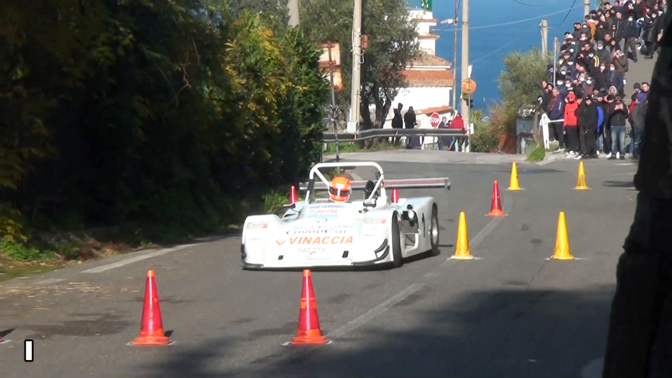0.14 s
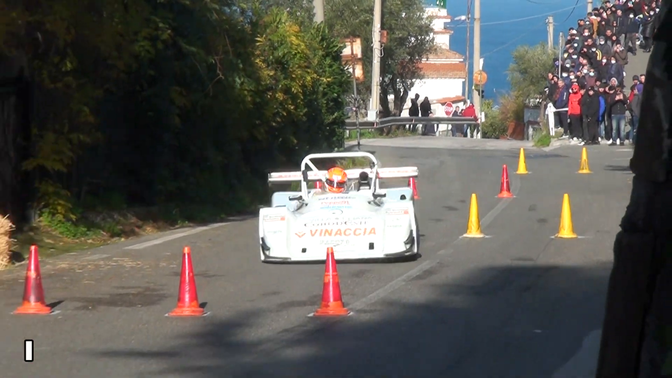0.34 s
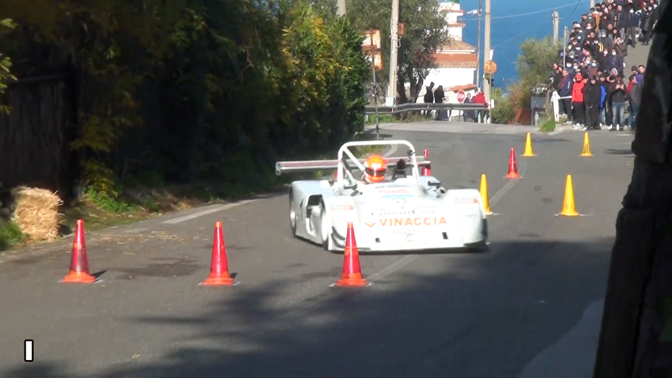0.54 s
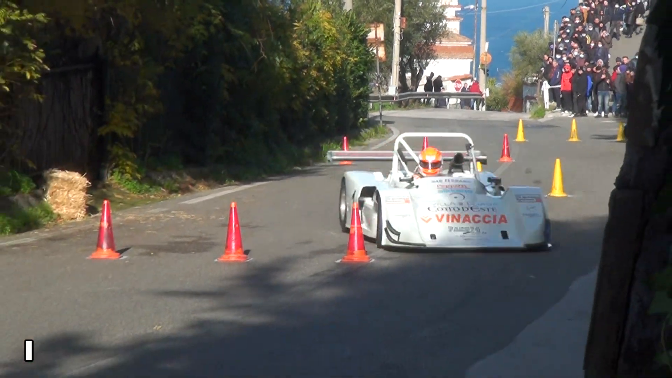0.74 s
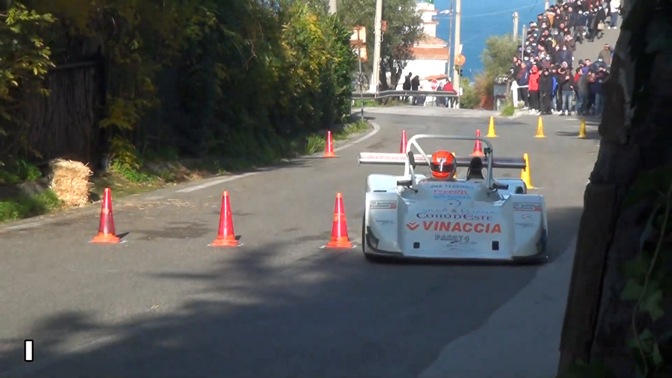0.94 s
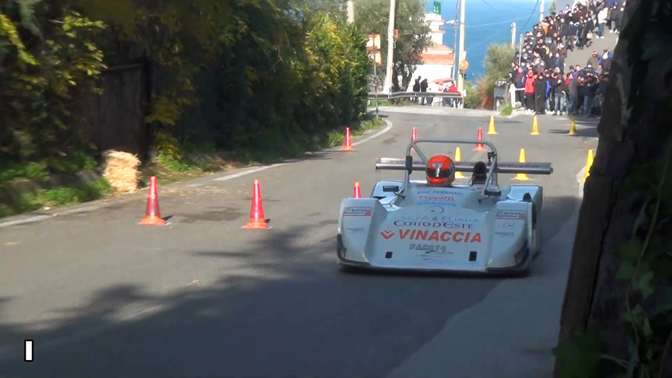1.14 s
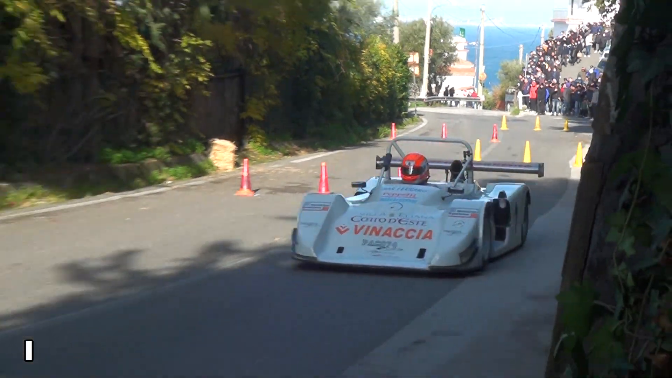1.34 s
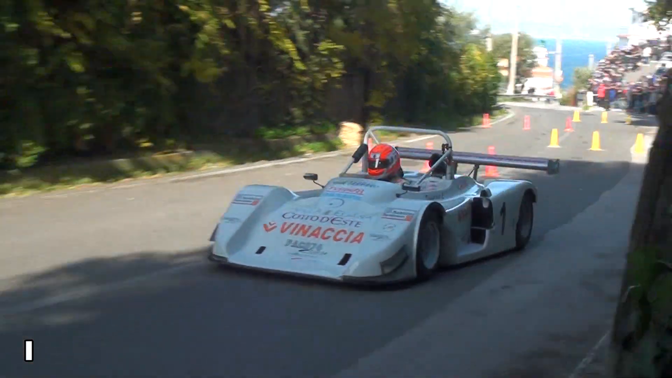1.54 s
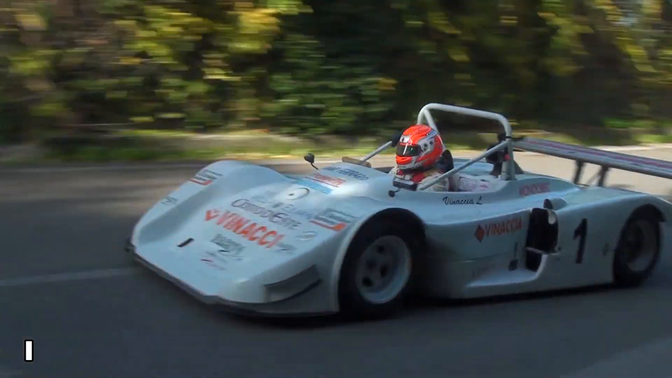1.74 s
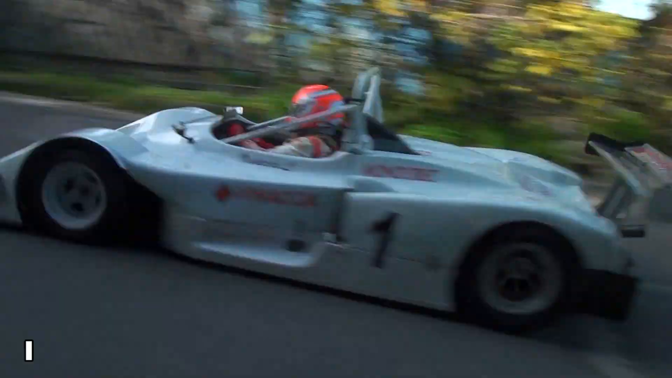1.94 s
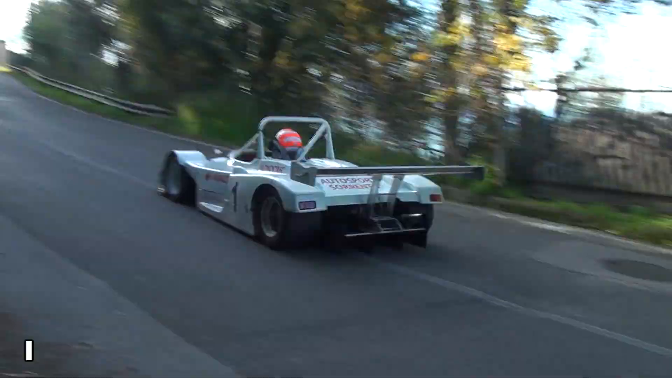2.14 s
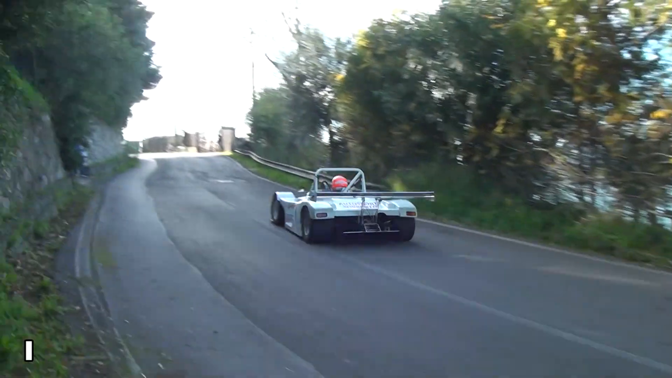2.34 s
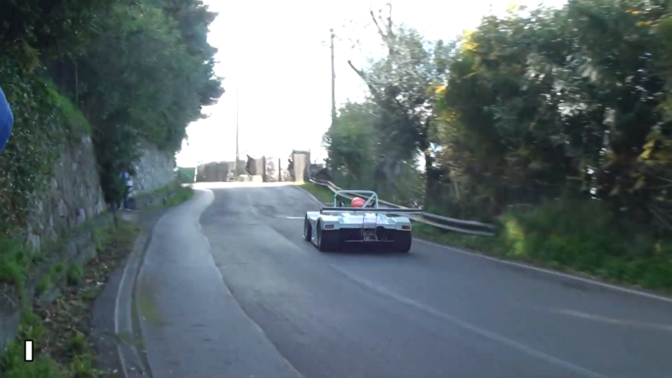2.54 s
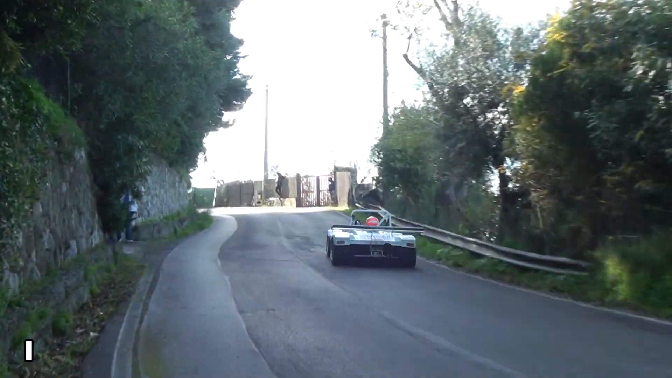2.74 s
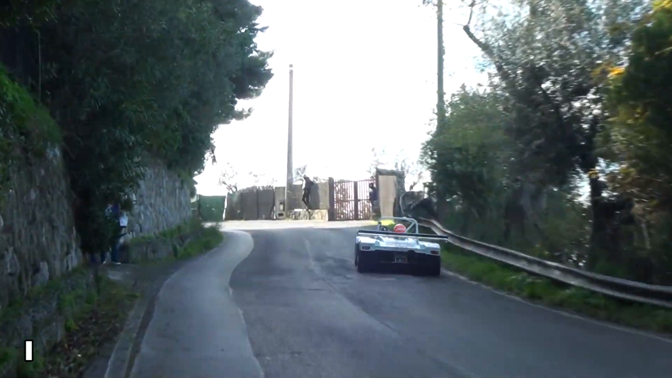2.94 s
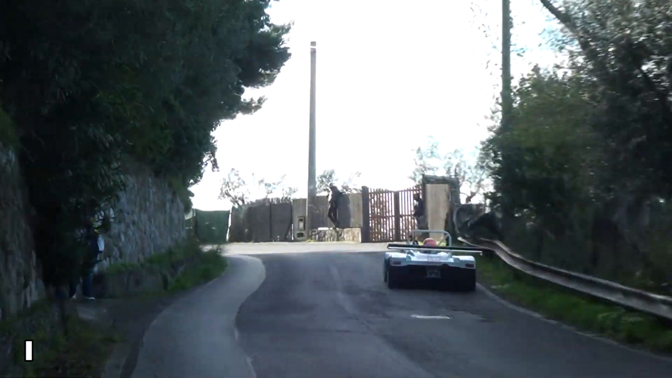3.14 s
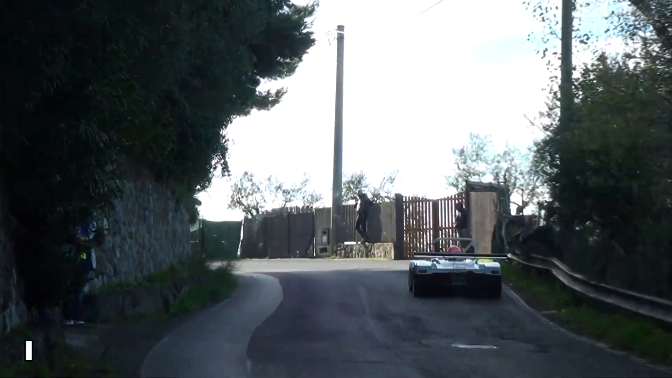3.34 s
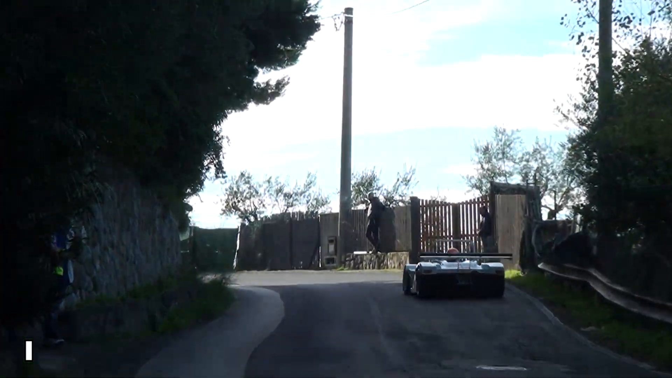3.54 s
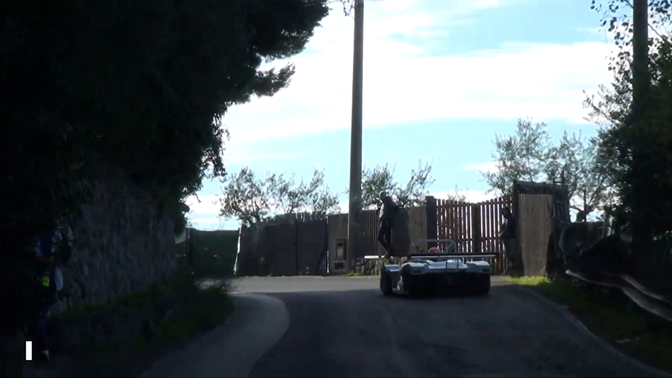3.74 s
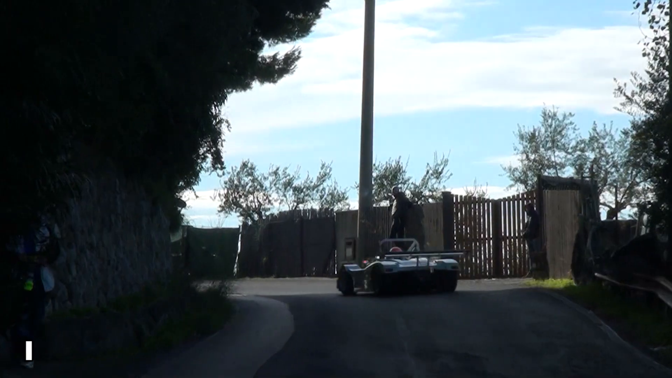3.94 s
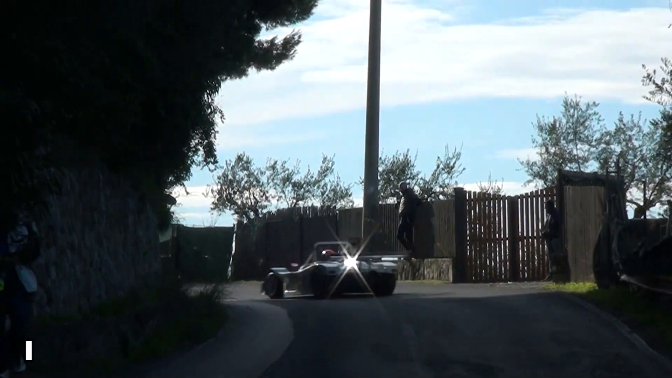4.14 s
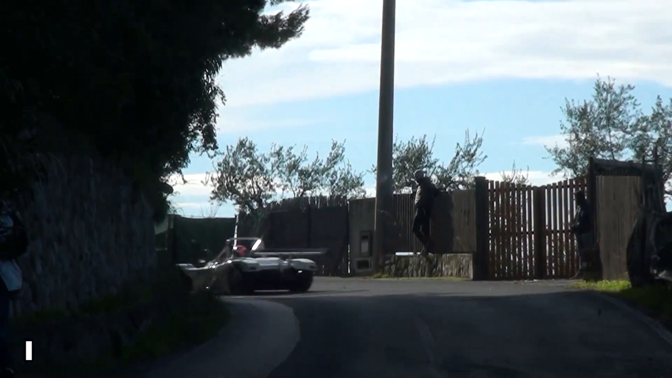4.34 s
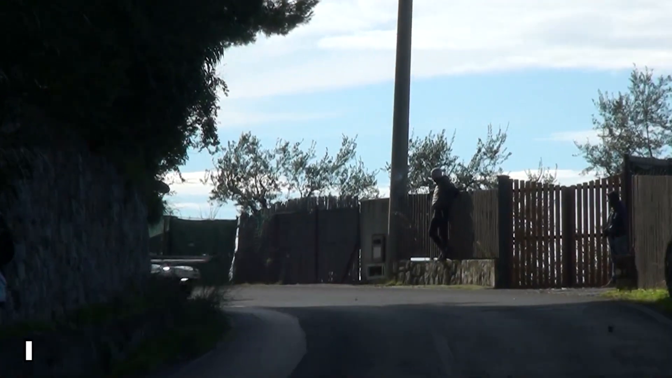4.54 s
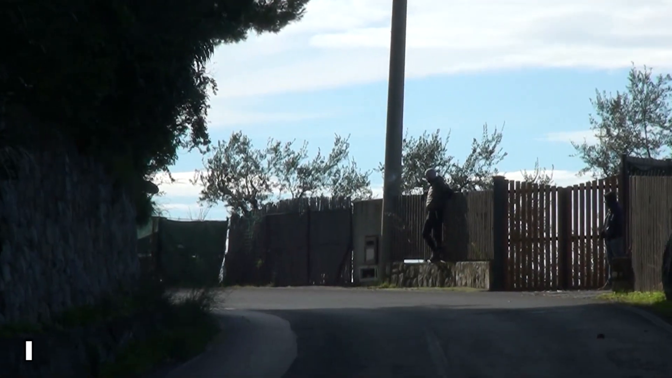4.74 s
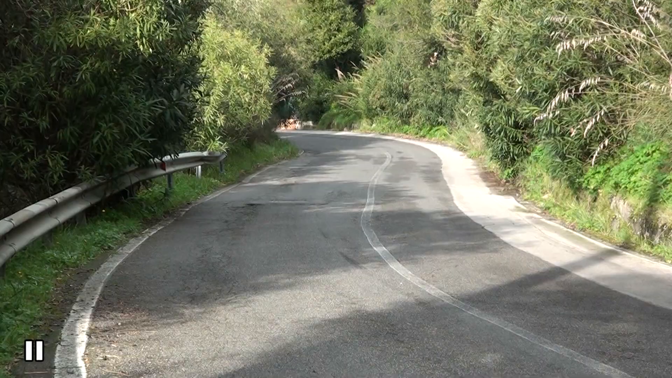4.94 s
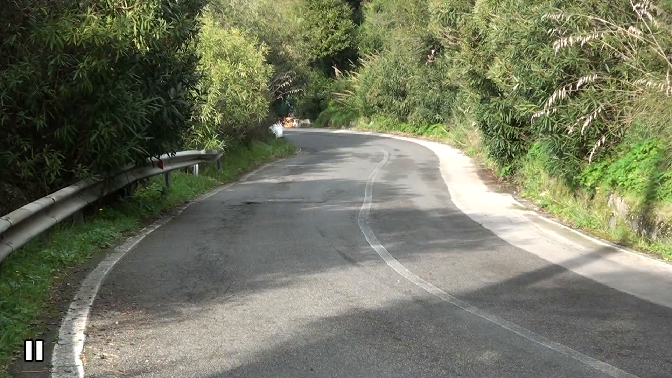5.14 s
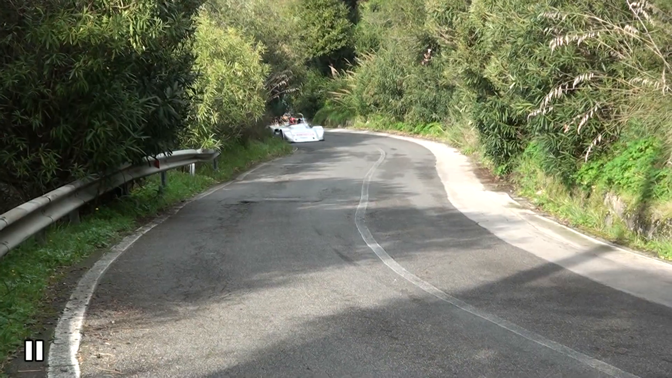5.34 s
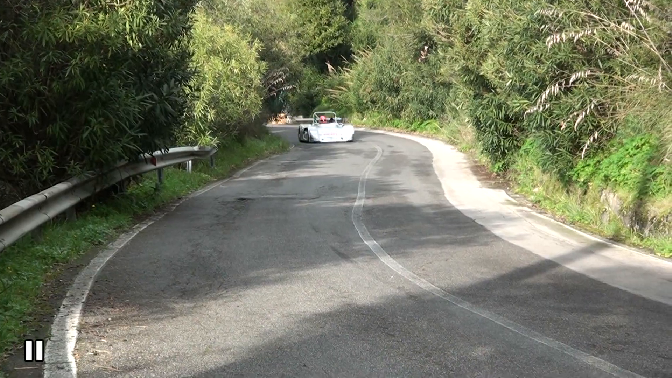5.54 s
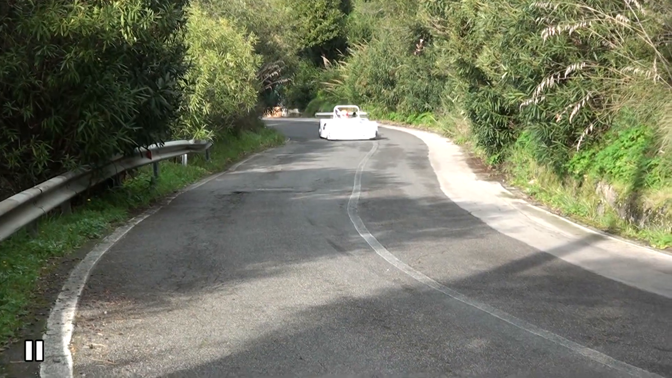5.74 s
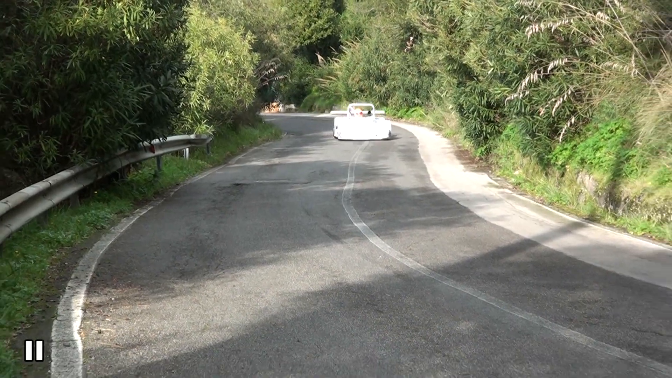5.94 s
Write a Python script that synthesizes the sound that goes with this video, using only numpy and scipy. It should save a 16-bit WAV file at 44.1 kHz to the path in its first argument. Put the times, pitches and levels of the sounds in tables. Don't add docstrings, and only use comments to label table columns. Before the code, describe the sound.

Outdoors on a narrow roadside, a four-cylinder racing car rumbles roughly from a chicane, then accelerates with rising pitch and roars past so close the microphone overloads and air thumps it. It pulls away loudly, lifts off with a burst of hollow backfires, and fades around a bend. An abrupt cut brings a higher, steadier engine note on a leafy road, with faint bank echo.

```python
import sys
import numpy as np
from scipy import signal
from scipy.fft import rfft, irfft
from scipy.io import wavfile
from scipy.ndimage import uniform_filter1d

SR = 44100
rng = np.random.default_rng(int(sys.argv[2]) if len(sys.argv) > 2 else 0)


def elevation(decibels):
    levels = np.asarray(decibels, float)
    return 10 ** (levels / 20)


def unload_wav(signal):
    wavfile.write(
        sys.argv[1],
        SR,
        np.round(np.clip(np.atleast_2d(signal).T, -1, 1) * 32767).astype(np.int16),
    )


N = 265041


def in_time(*shots):
    s, *columns = np.transpose(np.vstack(shots))
    return [np.interp(np.arange(N) / SR, s, c) for c in columns]


def at_hz(points, hz):
    return np.interp(np.log(hz), np.log(np.array(points)[:, 0]), np.array(points)[:, 1])


def rms_one(x):
    return x / np.sqrt(np.mean(x ** 2) + 1e-20)


def drift(rate_hz):
    r = np.exp(-40 * np.pi * rate_hz / SR)
    steps = rng.standard_normal(N // 20 + 2002)
    slow = signal.lfilter([1], [1, -2 * r, r * r], steps)[2000:]
    return np.interp(np.arange(N) / 20, np.arange(len(slow)), rms_one(slow))


def window(start_s, end_s, fade_s):
    t = np.arange(N) / SR
    return np.clip(np.minimum(t - start_s, end_s - t) / fade_s, 0, 1)


def ring(clicks, hz, level_db, t60_s):
    r, w = elevation(-60 / (t60_s * SR)), 2 * np.pi * hz / SR
    return signal.lfilter([0, elevation(level_db) * np.sin(w)], [1, -2 * r * np.cos(w), r * r], clicks)


def decay(clicks, t60_s):
    return signal.lfilter([1], [1, -elevation(-60 / (t60_s * SR))], clicks)


def colour(x, points):
    return irfft(rfft(x) * elevation(at_hz(points, np.linspace(1, SR / 2, N // 2 + 1))), N)


# frequency in Hz, left-right likeness from 0 to 1.
PORT_LIKENESS = [(40, 0.88), (150, 0.79), (500, 1), (1000, 0.79), (2000, 1), (4000, 0.77), (8000, 1),
                 (14000, 0.39)]


def stereo_noise(gate, points):
    alike = np.clip(at_hz(PORT_LIKENESS, np.linspace(1, SR / 2, N // 2 + 1)), 0, 1)
    mid = np.sqrt(1 + alike) * rfft(colour(gate * rng.standard_normal(N), points))
    side = np.sqrt(1 - alike) * rfft(colour(gate * rng.standard_normal(N), points))
    return rms_one(irfft(mid + side * [[1], [-1]], N))


# frequency in Hz, density in dB per Hz.
HISS_SPECTRUM = [(3000, -19), (8000, 0), (11000, -8.5), (12200, -5), (14000, -22), (15500, -13.5)]


def microphone_hiss():
    return elevation(-57.5) * stereo_noise(1, HISS_SPECTRUM)


# centre in seconds, peak in dB, half length in seconds.
GUSTS = [(0.049, -21.5, 0.12), (0.353, -37, 0.67), (0.913, -45, 0.036), (1.295, -58, 0.57),
         (2.125, -5, 0.19), (2.34, -13, 0.022), (2.525, -23, 0.048), (2.7, -56, .4), (3.111, -35, 0.13),
         (3.425, -37, .06), (3.583, -37, 0.11), (3.927, -30.5, 0.029), (4.1, -49, 0.076),
         (5.107, -40.5, 0.21), (5.379, -36.5, 0.32), (5.548, -32, 0.24), (5.85, -51.5, 0.46)]
CALM_DB, GUST_FALL_DB = -62.5, 24.5


def gust_level():
    t = np.arange(N) / SR
    swells = sum(elevation(db - GUST_FALL_DB * ((t - s) / half) ** 2) for s, db, half in GUSTS)
    return 20 * np.log10(elevation(CALM_DB) + swells)


# time in seconds, level in dB.
BUFFETS = [
    (2.06, -5),
    (2.12, -19.5),
    (2.324, -1),
]


def wind():
    pushes = np.zeros(N) + 1e-18
    for s, level_db in BUFFETS:
        pushes[round(s * SR)] = elevation(level_db)
    thumps = ring(pushes, 56, -1, 0.078) * [[1], [.6]]
    rumble = stereo_noise(1, [(12, -15.5), (28, -7.5), (60, 3.0), (100, -5.0), (200, 1.0), (400, -56)])
    return elevation(gust_level() + 1.5 * drift(19.0)) * rumble + thumps


def order(turns, multiple, level_db, flutter_db, wobble, rate_hz, start):
    phase = 2 * np.pi * (multiple * turns + start) + wobble * np.sqrt(multiple) * drift(rate_hz)
    apart = 0.25 * drift(1.31) * [[1], [-1]]
    return np.sqrt(2) * elevation(level_db + flutter_db * drift(rate_hz)) * np.sin(phase + apart)


# start in seconds, end in seconds, pitch ratio, level in dB.
ECHOES = [
    (0.87, 1.886, 0.905, -25),
    (4.96, 6.1, 0.875, -28),
]


def bank_echo(firing_hz):
    orders_db, fade_s, blur_s = (-17, 1.5, -1), 0.062, 0.14
    blurred_hz, echo = uniform_filter1d(firing_hz, int(blur_s * SR)), 0
    for start, end, ratio, level_db in ECHOES:
        turns = np.cumsum(ratio * blurred_hz) / SR
        copies = sum(order(turns, k, level_db + db, 2.5, .3, 20, 0) for k, db in enumerate(orders_db, 1))
        echo = echo + window(start, end, fade_s) * copies
    return echo


# time in seconds, pitch in Hz, level in dB.
DRONE = [
    (5.28, 246.7, -43),
    (5.344, 229.7, -24),
    (5.406, 206.5, -22.5),
    (5.492, 233.8, -21),
    (5.72, 230, -25.5),
]


def labouring_drone():
    hz, level_db = in_time(DRONE)
    swell = window(DRONE[0][0] - .04, DRONE[-1][0] + 0.028, .045)
    return swell * order(np.cumsum(hz) / SR, 1.0, level_db, 1.6, 0.86, rate_hz=15, start=0)


# frequency in Hz, density in dB per Hz.
GROWL_SPECTRUM = [(90, -45), (150, -16), (250, 5), (400, -4.5), (650, 8.5), (850, 7), (1200, -18),
                  (2000, -61.5)]
# time in seconds, peak in dB, crack relative to the peak in dB.
BACKFIRES = [(0.088, -22.5, -28), (3.06, -2.5, -20), (3.429, 7, -30), (3.552, 14.5, -20), (3.582, 1, -12.5),
             (3.599, -8.5, -13), (3.621, -1, -12), (3.644, -12, -8), (3.9, 8, -27), (3.924, 4.5, -39),
             (3.959, -10, -7.5), (4.081, -5.5, -10.5), (4.109, -4.5, -24), (4.159, -3, -40),
             (4.199, -6, -31), (4.419, -6, -18), (4.662, -15.5, -8)]
# frequency in Hz, level in dB, t60 in seconds.
PIPE_MODES = [(270, -19, 0.045), (490, -10.5, 0.048), (684, -7.5, 0.035), (1600, -11, 0.018)]
# frequency in Hz, density in dB per Hz.
CRACK_SPECTRUM = [(800, -29), (2000, 4.5), (6000, -12), (12000, -49)]


def backfires():
    s, peak_db, crack_db = np.transpose(BACKFIRES)
    blows, cracks = np.zeros((2, N)) + 1e-18
    at = np.round(s * SR).astype(int)
    blows[at], cracks[at] = elevation(peak_db), elevation(peak_db + crack_db)
    bang = elevation(-3) * sum(ring(blows, *mode) for mode in PIPE_MODES)
    bang = signal.sosfilt(signal.butter(2, 130, "high", fs=SR, output="sos"), bang)
    slap = elevation(-10) * decay(blows, 0.07) * stereo_noise(1, GROWL_SPECTRUM)
    crack = elevation(-1.0) * decay(cracks, 0.047) * stereo_noise(1, CRACK_SPECTRUM)
    return bang + slap + crack


# frequency in Hz, density in dB per Hz.
RASP_SPECTRUM = [(590, -56), (1000, 0), (1440, -4), (1580, 1), (1940, -5.5), (2130, -3), (2650, -5),
                 (6410, -19), (9150, -36), (15500, -46.5)]


def gas_jet(turns, rasp_db, bright_db, growl_db):
    strength = elevation(2 * rng.standard_normal(int(turns[-1]) + 2))[turns.astype(int)]
    puffs = strength * (.9 + np.exp(-5 * (turns % 1))) * elevation(.8 * drift(9))
    rasp = stereo_noise(puffs, [(500, -32)] + list(RASP_SPECTRUM))
    dull = signal.sosfiltfilt(signal.butter(1, 4200, fs=SR, output="sos"), rasp)
    top = signal.sosfiltfilt(signal.butter(3, 7600, "high", fs=SR, output="sos"), rasp)
    air_db = bright_db + 15.5
    top_db = 2.0 * air_db + 0.22 * (rasp_db + 34.0)
    rasp = dull + elevation(air_db) * (rasp - dull - top) + elevation(top_db) * top
    growl = stereo_noise(strength * elevation(drift(29)), GROWL_SPECTRUM)
    return elevation(rasp_db + 0.06) * rasp + elevation(growl_db - 15.0) * growl


def bounce(hz, lag_ms, share, dull_hz):
    share = np.clip(share, 0, .98) * np.exp(-(hz / dull_hz) ** 2)
    return 10 * np.log10(1 + share ** 2 + 2 * share * np.cos(2 * np.pi * hz * lag_ms / 1000))


def bounces(hz, lags_ms):
    hz, road_ms, wall_ms = (c[::32] for c in (hz, *lags_ms))
    both = bounce(hz, road_ms, share=0.87, dull_hz=990) + bounce(hz, wall_ms, share=0.37, dull_hz=2980)
    return np.interp(np.arange(N) / 32, np.arange(len(both)), both)


# frequency in Hz, level in dB.
LOW_COLOUR = [(140, -0.5), (240, 2), (330, -2), (470, 1.5), (620, 1), (800, -2), (1100, -11), (1400, -10.5)]
# multiple of the firing rate, level in dB.
HALF_ORDERS = [(.5, -44), (1.5, -11), (2.5, -16), (3.5, -14.5), (4.5, -29), (5.5, -49.5)]
# frequency in Hz, level over the rasp in dB.
UPPER_COLOUR = [(700, 19), (1100, 2), (1300, 5), (1550, 5), (1950, 1.5), (2400, -3.5), (2900, -8.5),
                (3600, -5.5), (4700, -8), (6000, -17)]
FADING_DB, FADING_PER_S = 1.93, 5.3


def exhaust_tone(turns, firing_hz, tone_db, lags_ms, rough, uneven_db, upper_db):
    out, strong_power = 0, 0
    for k in range(1, 5):
        level_db = tone_db + at_hz(LOW_COLOUR, k * firing_hz) + bounces(k * firing_hz, lags_ms)
        level_db = level_db + FADING_DB * rough * drift(FADING_PER_S)
        strong_power = strong_power + elevation(2 * level_db)
        out = out + order(turns, k, level_db, 1.1 * rough, .13 * rough, 22, .11 * (k - 1))
    strong_db = 10 * np.log10(strong_power)
    for k, db in HALF_ORDERS:
        out += order(turns, k, strong_db + uneven_db + db, 3, .35, 15, rng.random())
    jittered = turns + (.0015 + .0055 * rough) * drift(60)
    for k in range(5, 23):
        level_db = upper_db + at_hz(UPPER_COLOUR, k * firing_hz) + bounces(k * firing_hz, lags_ms)
        out += order(jittered, k, level_db, 3, .12 * rough, 9, .004 * k * k)
    return out


# time in seconds, firing rate in Hz, tone in dB,
# lag of the road bounce in ms, gas jet in dB.
CHICANE = [(0.0, 164.2, -22, 0.91, -30.5), (0.11, 158.7, -21, 1.08, -33.5), (0.2, 154.4, -21, 1.38, -28.5),
           (0.3, 152.9, -24, 1.28, -28.5), (0.5, 156.1, -24.5, 1.7, -26), (0.67, 154.9, -20, 1.57, -29),
           (0.75, 153.4, -22, 3.4, -29.5), (0.85, 152, -16, 3.53, -25), (0.915, 166, -19, 4.2, -24.5)]
CHARGE = [(0.929, 177.9, -17, 1.6, -22), (1.068, 170.2, -20.5, 2.85, -20), (1.3, 189.1, -19, 1.8, -20),
          (1.47, 208.8, -22, 1.05, -22), (1.58, 227, -18.5, 1.13, -18), (1.72, 231.7, -17, 1.005, -15),
          (1.84, 251.2, -13, 1.16, -15), (2.04, 272.2, -10, 1.32, -12.5), (2.11, 258.4, -10, 1.25, -11.5)]
CLIMB = [(2.21, 275.8, -14, 1.35, -7.5), (2.27, 239.8, -11, 0.67, -16.5), (2.341, 229.8, -14, 0.72, -14),
         (2.428, 218.5, -9, 1.29, -18.5), (2.6, 234, -7, 1.846, -18), (2.711, 245.4, -6.5, 1.893, -21.5),
         (2.798, 241.2, -7, 1.99, -24), (3.011, 258, -11, 2.01, -23), (3.11, 221.7, -14, 2.24, -21)]
BRAKING = [(3.19, 255.2, -17, 2.0, -16.5), (3.33, 224.8, -14.5, 1.87, -22), (3.462, 221.5, -14, 2.09, -23),
           (3.551, 231.2, -20, 2.2, -25), (3.669, 204.8, -21.5, 1.57, -23), (3.85, 179.5, -20, 1.41, -23),
           (3.902, 189.9, -25.5, 1.1, -20.5), (3.96, 185.7, -28, 1.1, -28.5),
           (4.101, 194.2, -26.5, 0.81, -28)]
BEND = [(4.141, 199.5, -25.5, 0.83, -38.5), (4.219, 209.2, -19, 1.182, -28.5),
        (4.399, 193.1, -24.5, 1.13, -37), (4.5, 201.2, -16, 0.85, -31), (4.61, 202.4, -18, 1.23, -24),
        (4.689, 214.5, -18.5, 0.85, -24.5), (4.802, 202.6, -28, 0.98, -32),
        (4.947, 206.4, -27.5, 1.04, -37)]
LEAFY_ROAD = [(4.949, 308.6, -14.5, 1.52, -18), (5.102, 304.4, -16.5, 1.45, -17.5),
              (5.191, 290.1, -17.5, 1.3, -16), (5.3, 304.6, -18.5, 1.23, -15.5),
              (5.46, 284, -34, 0.81, -16.5), (5.59, 286, -24, 0.99, -19), (5.689, 311.1, -17.5, 1.4, -19.5),
              (5.76, 294.5, -17, 1.6, -18), (6.01, 304.3, -16.5, 1.65, -18.5)]
# time in seconds, roughness (no unit), cylinder unevenness in dB,
# clarity of the upper orders in dB, brightness in dB.
RUNNING = [
    [(0, 1.86, 6, -2.5, -15.5), (.25, 1.23, -1.5, -6.5, -13), (.75, 1.6, -5, -4.5, -11.5),
     (.9, 1.05, -38, -3.5, -14.5)],
    [(.95, 1.57, -38, -7, -12), (1.6, 1.75, -36, -1, -10), (2.1, 1.52, -15, 11, -11.5),
     (2.27, 1.9, -37, -2, -7), (2.4, 0.88, -23, 12, -11.5), (3.0, 0.77, -6, 2, -5),
     (3.1, 1.8, -12, 5, -7.5), (3.22, 0.99, -24, -6.5, -15.5), (3.42, 1, -28, 4, -11),
     (3.6, 1.5, -35, 2.5, -8.5), (3.72, 0.43, -41, -5.5, -13.5), (4.15, 0.95, -26, -1.5, -15),
     (4.35, 0.71, -28, 3.5, -13.5), (4.65, 0.45, -37, 5, -13), (4.94, 0.88, -32, -7, -8)],
    [(4.95, 0.9, -41, -12, -47), (5.55, 2.76, -26, -7, -21.5), (5.72, 1.23, -30, -3, -19.5),
     (6.01, 1.2, -30, -7, -18)],
]
# time in seconds, lag in ms.
WALL_LAG = [
    [(0, 3.23), (.2, 3.27), (.43, 3), (.67, 1.42), (.915, 0.85)],
    [(.93, 2.95), (1.15, 1.44), (1.31, 0.26), (1.79, 0.44), (1.97, 0.53), (2.11, 1.95), (2.27, 0.38),
     (2.59, 0.51), (2.75, 1.54), (3.55, 1.465), (3.65, 0.99), (4.03, .5), (4.19, 2.12), (4.947, 2.35)],
    [(4.949, 2.33), (5.35, 2.97), (6.01, 3.06)],
]
# time in seconds, left over right in dB.
SIDE_OF_CAR = [(0, 2), (.7, 3), (1.5, 2), (2.0, -0.5), (3.0, 1.5), (4.0, 0.5), (4.95, -0.3), (6.01, -1.3)]


def racing_car():
    firing_hz, tone_db, road_ms, rasp_db = in_time(CHICANE, CHARGE, CLIMB, BRAKING, BEND, LEAFY_ROAD)
    rough, uneven_db, clarity_db, bright_db = in_time(*RUNNING)
    rough = np.clip(rough, 0, 4)
    growl_db = -19 + 8 * rough + 0.36 * (tone_db + 19.5)
    turns = np.cumsum(firing_hz) / SR
    lags_ms = (road_ms, *in_time(*WALL_LAG))
    upper_db = rasp_db - 12.0 + clarity_db
    car = exhaust_tone(turns, firing_hz, tone_db, lags_ms, rough, uneven_db, upper_db)
    car = car + gas_jet(turns, rasp_db, bright_db, growl_db) + bank_echo(firing_hz) + labouring_drone()
    level_db = 10 * np.log10(uniform_filter1d(np.mean(car ** 2, axis=0), size=6000) + 1e-12)
    drive_db, knee_db = 11.5, -5.5
    car = car * elevation(drive_db * np.clip((level_db - knee_db) / 8.1, 0, 1)) + backfires()
    (pan_db,) = in_time(SIDE_OF_CAR)
    return car * elevation([pan_db / 2, -pan_db / 2])


def scene():
    return microphone_hiss() + wind() + racing_car()


def low_pass(x):
    return signal.sosfilt(signal.butter(12, 15670, fs=SR, output="sos"), x)


def record(dry):
    port_lag = 2
    x = np.array([dry[0], np.roll(dry[1], port_lag)])
    ceiling = np.where(x > 0, 0.8, 0.64)
    x = x / (1 + np.abs(x / ceiling) ** 5.52) ** (1 / 5.02)
    x = signal.sosfilt(signal.butter(1, 15, "high", fs=SR, output="sos"), x)
    x = signal.sosfilt(signal.cheby2(12, 50, 15900, fs=SR, output="sos"), x)
    return low_pass(np.clip(x, -1, 1))


dry = scene()
out = record(dry)
unload_wav(out)
```